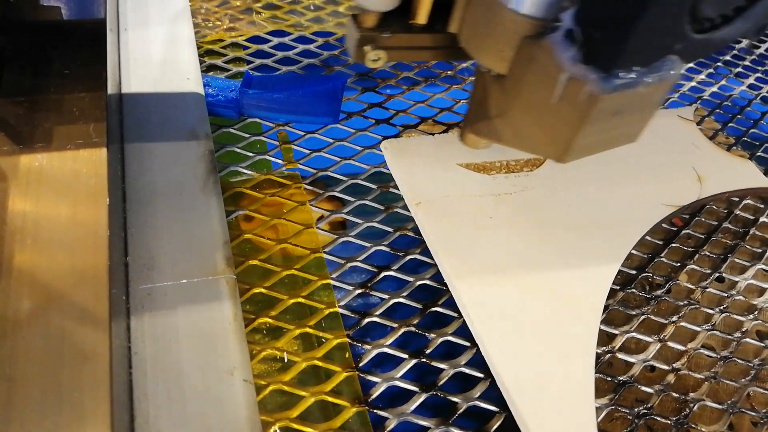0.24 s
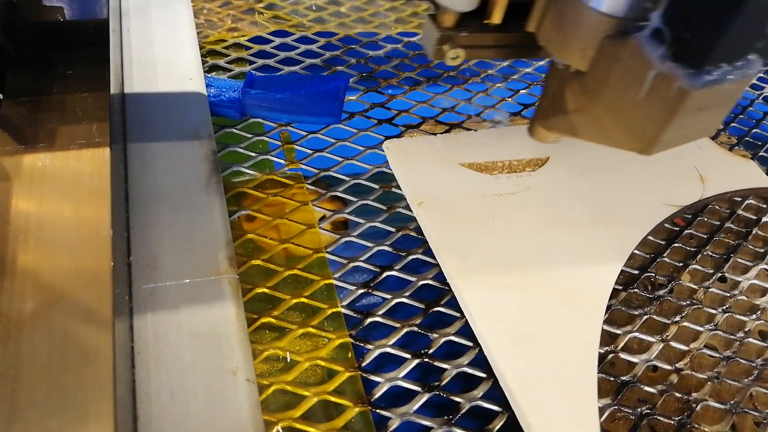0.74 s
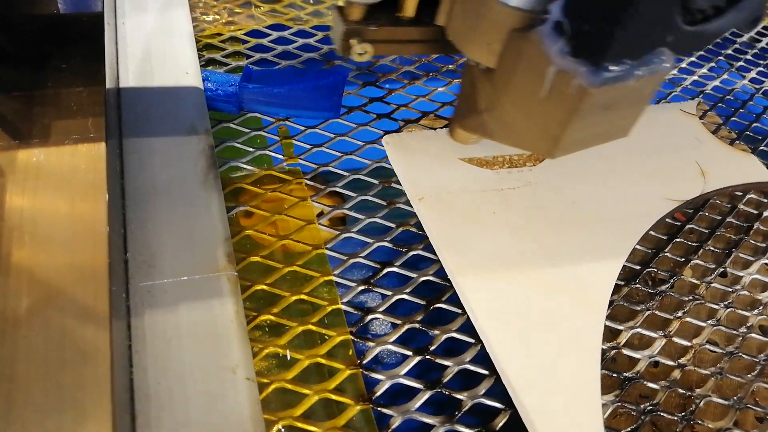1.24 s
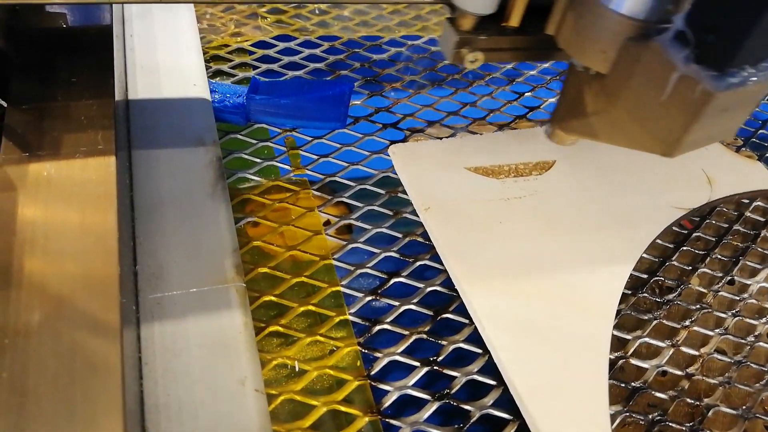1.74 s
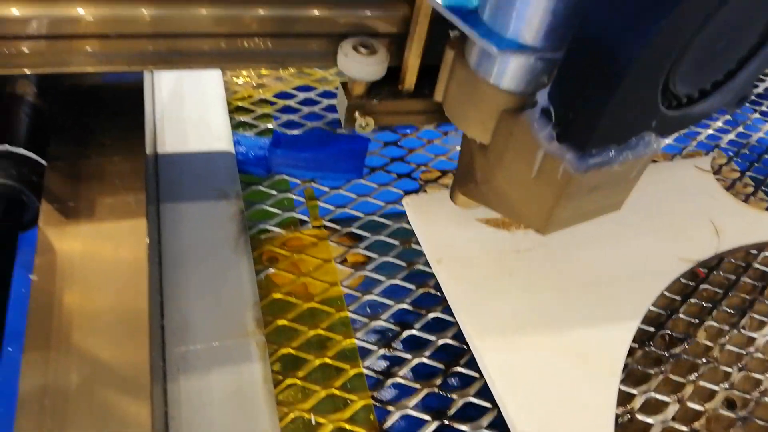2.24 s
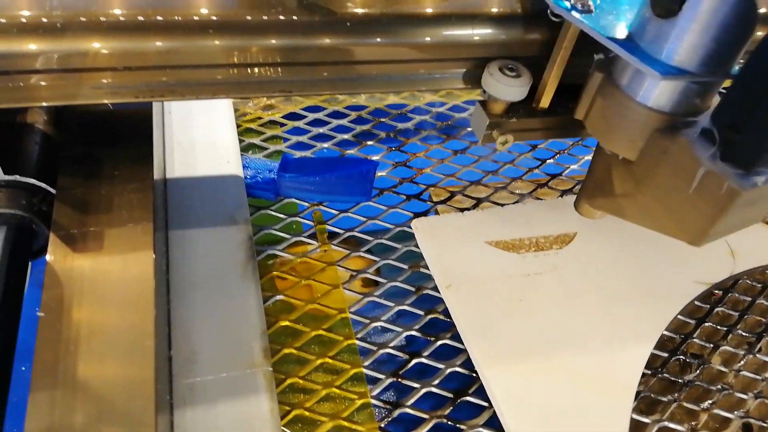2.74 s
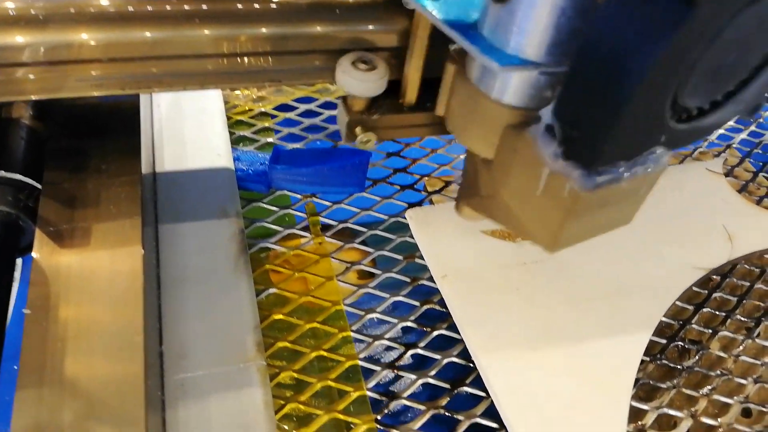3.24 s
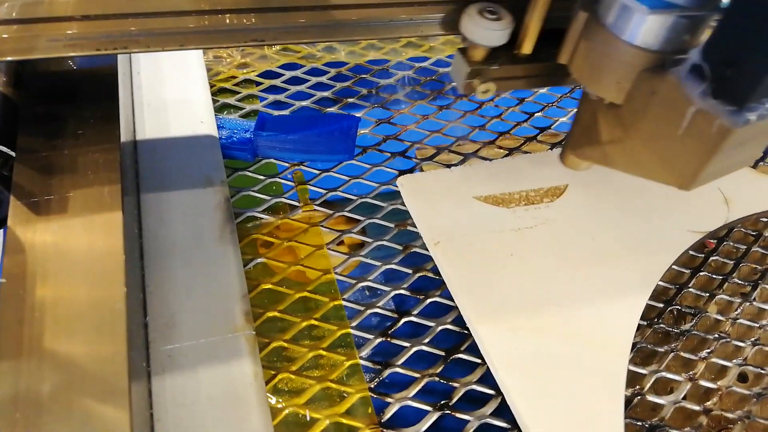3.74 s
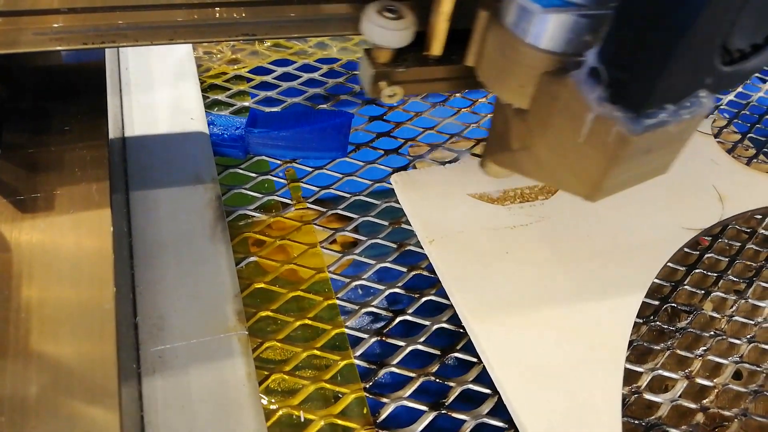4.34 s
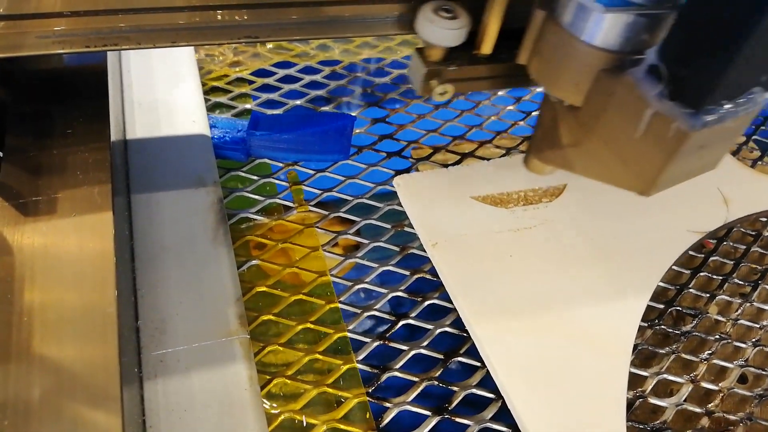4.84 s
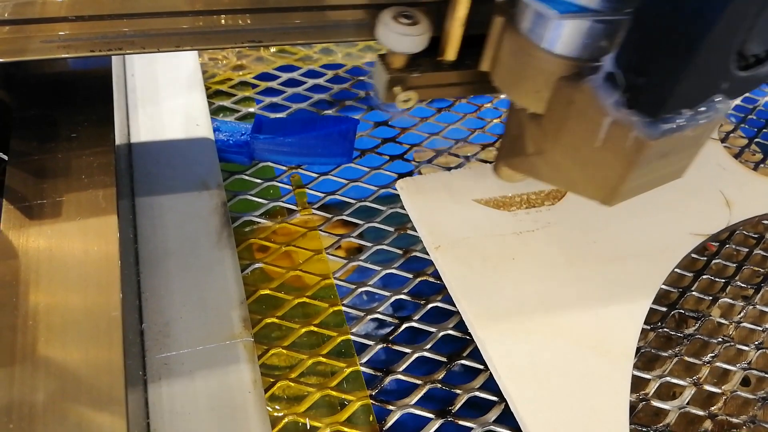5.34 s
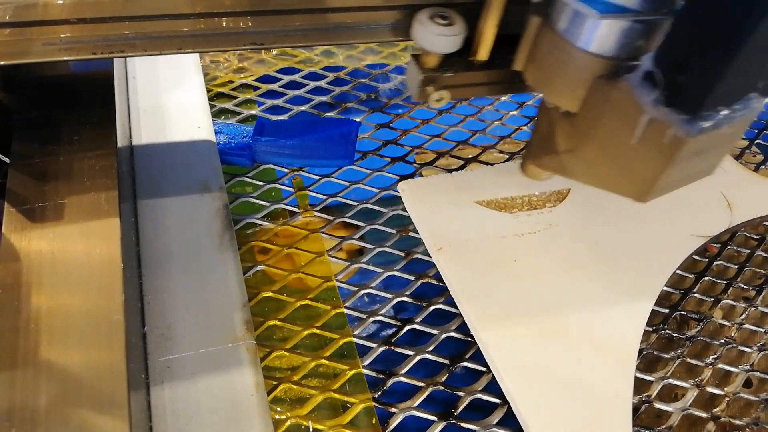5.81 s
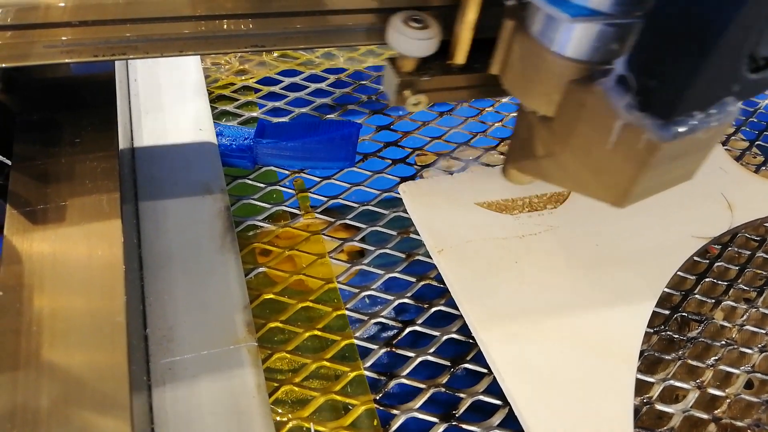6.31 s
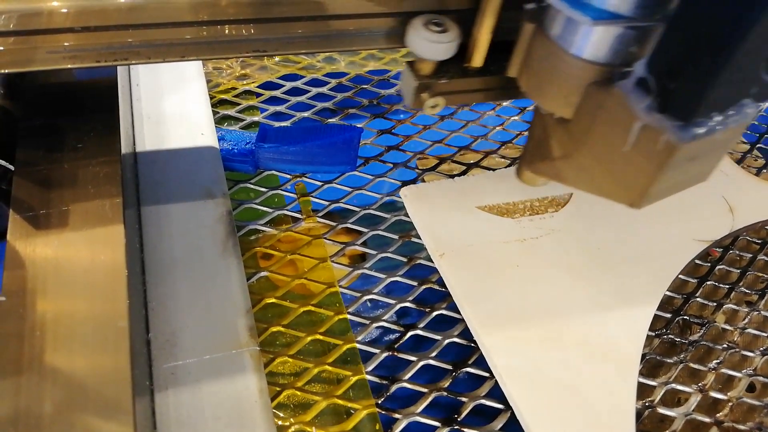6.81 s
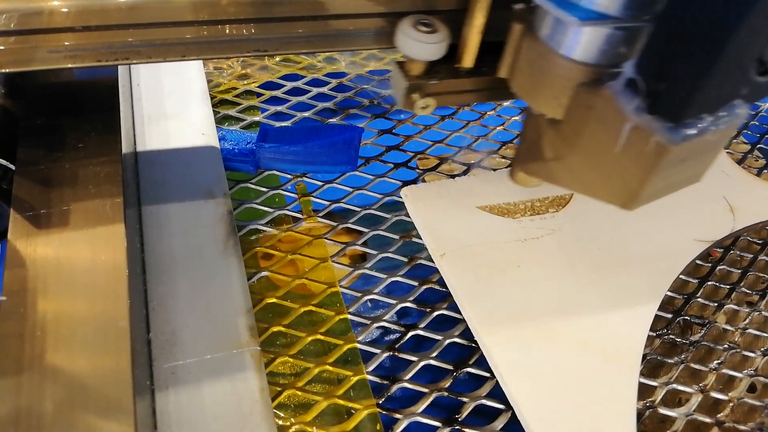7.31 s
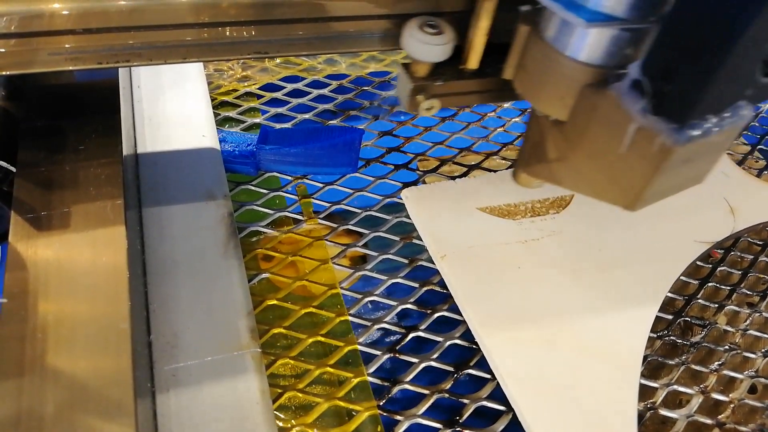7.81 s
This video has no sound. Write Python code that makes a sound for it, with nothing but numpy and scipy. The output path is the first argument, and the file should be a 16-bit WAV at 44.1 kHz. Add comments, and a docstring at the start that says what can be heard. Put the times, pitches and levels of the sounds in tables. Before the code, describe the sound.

A laser engraver's stepper motor sings a steady buzzy tone, dipping and rising at each turn twice a second, over rattling rollers and fan hum.

```python
"""A stepper motor sings as a laser engraver rasters line by line, heard from inside the case: a stack of tones
holds at full speed and glides down and up at every turn. Carriage rollers rattle as noise ringing the rail,
short bright noise ticks mark the turns, and each line feed swells frame tones and panel rumble. Fans and mains
hum on underneath as wavering tones, rumble and hiss; fingers creak on the camera as dull taps, and there is
one brief squeak."""
import sys
import numpy as np
from scipy import signal
from scipy.fft import rfft, irfft, next_fast_len
from scipy.io import wavfile
from scipy.ndimage import uniform_filter1d, map_coordinates

SR = 44100
rng = np.random.default_rng(int(sys.argv[2]) if len(sys.argv) > 2 else 0)


def store_wav(level_fs):
    """Save 16-bit WAV to argv[1]."""
    pcm = np.round(np.clip(np.atleast_2d(level_fs), -1, 1) * 32767)
    wavfile.write(sys.argv[1], SR, pcm.T.astype(np.int16))


N = 355578
T = np.arange(N) / SR  # time in s

# Spectra give relative level per Hz; each noise is brought to its own level afterwards.
# Mains and fan tones: f/Hz, mean level/dB, left-right/dB, left lead/rad, waver/dB
HUM_TONES = [(100.0, -48, .1, .02, 1.5), (200.0, -39.3, .3, .42, .6), (224.0, -42.3, -1.1, .44, 1.5),
             (298.2, -55, 2.5, .96, 2.5), (521.7, -48.8, 6.7, -2.65, 1), (596.5, -61.5, -.7, 3.06, 2),
             (745.5, -59, 1, 3.0, 2.5), (1043.4, -63, 3, -3.05, 2), (2086.8, -72, 0, -1, 2)]
# Air resonances colouring the fan rumble: f/Hz, width/Hz, level/dB
DUCT_MODES = [(71.6, 5, 12), (174.4, 8.9, -1.5), (363.7, 4.4, 3.5), (451, 20, 9.5), (690, 17, 7),
              (875, 13, -19), (1571, 19.6, 9), (1837, 23, 15)]
# Fan rumble spectrum: f/Hz, level/dB
RUMBLE_SPECTRUM = [(12, -60), (20, -20.5), (85, -5), (144, -6.5), (210, 0), (340, -9.5), (560, -16),
                   (900, -8.5), (1180, -19.5), (1330, -16), (1750, -15), (1930, -29.5), (2500, -35),
                   (4000, -120)]
# Air jet hiss spectrum: f/Hz, level/dB
HISS_SPECTRUM = [(1200, -50), (1900, -1.5), (2400, -1.5), (2650, -2), (2900, -8), (3150, -2), (4270, -2),
                 (4620, -3.5), (7560, -3), (9170, -5), (11400, -17), (14500, -23), (15600, -30)]
# Finger creaks on the camera's right side: t/s, level/dB (before the pulse shape)
FINGER_TAPS = [(2.351, -24), (2.4875, -17), (2.5248, -14.5), (2.580, -19), (2.83, -22)]
# Brief squeak: start t/s, end t/s, f/Hz, mean level/dB
SQUEAK_NOTE = (3.27, 3.312, 3500, -54)

# The head stands still: t/s, line feed shake level/dB
STANDSTILLS = [(-.066, -31.5), (.407, -35.5), (.881, -37), (1.357, -38), (1.832, -35), (2.309, -37.5),
               (2.785, -39.5), (3.263, -38), (3.744, -37), (4.225, -38), (4.707, -36), (5.189, -38),
               (5.673, -36), (6.157, -39), (6.643, -37), (7.131, -36.5), (7.617, -35), (8.105, -39)]
# Short bright ticks at each turn: t/s from standstill, mean level/dB (before smoothing)
TURN_TICKS = [(-.036, -42.5), (0.017, -41)]
# Turn tick spectrum: f/Hz, level/dB
TICK_SPECTRUM = [(3000, -43.5), (5500, -36), (6900, 8), (8800, 7), (10800, -14), (12000, -35.5)]
# Frame modes, relative to the shake: mean f/Hz, mean level/dB, left-right/dB, left lead/rad
FRAME_MODES = [(174.5, -2, 0.5, 0.43), (279.6, -6.5, -2, 1), (358.7, -7.5, -1, 1)]
# Panel rumble spectrum: f/Hz, level/dB
PANEL_SPECTRUM = [(90, -60.5), (160, 2.5), (300, -0.5), (450, -6.5), (750, -9.5), (1000, -13.5),
                  (1600, -22.5), (2200, -60.5)]
MODE_MIX_DB = 2  # spread of each frame mode's level from one line feed to the next

# Rattle along a stroke, by share of the way from turn to turn: share, mean level/dB
STROKE_RATTLE = [(.12, -42.5), (.28, -40), (.47, -43), (.65, -40), (.85, -39.5)]
# Roller rattle spectrum before the rail rings: f/Hz, level/dB
RATTLE_SPECTRUM = [(1180, -52), (2000, -28), (2920, -60), (3100, -5), (3400, -13.5), (3490, -9), (4110, 1),
                   (4720, -5), (5140, -2), (5850, -8.5), (7630, -1), (9620, 1), (12100, -11.5),
                   (14900, -13), (15600, -32.5)]
# Rail and carriage modes: f/Hz, width/Hz, level/dB
RAIL_MODES = [(3520, 59, 4.5), (3899.6, 77, 1), (4270, 104, 0.5), (4880, 77.7, -4), (9200, 71, -15),
              (9480, 82, 6), (10020, 310, 5.5), (11084, 80, 10)]
# Roller knocks at set times, mostly loud: t/s, level/dB (before smoothing)
SET_KNOCKS = [(.2709, -38), (.5022, -34), (.5879, -34), (.679, -40), (.6972, -41), (.7446, -41),
              (1.2535, -49), (1.282, -42), (1.507, -29.5), (1.5369, -33), (1.6544, -32), (1.696, -31),
              (1.7493, -33), (1.888, -41), (2.0581, -33), (2.4086, -37), (2.6493, -32), (3.1586, -38),
              (3.581, -41), (4.131, -36.5), (4.3723, -35), (4.5216, -34.5), (4.8339, -46), (5.0966, -43),
              (5.4664, -31), (5.8043, -36), (5.857, -35), (6.0368, -42), (6.0595, -35.5), (6.308, -38),
              (6.3795, -34), (6.4007, -32.5), (6.5483, -31), (6.7078, -33.5), (6.9972, -33), (7.2963, -38),
              (7.341, -34.5), (7.527, -39), (7.7042, -41), (7.9108, -35), (7.9916, -46)]
# More, mostly softer knocks at random times: mean rate/s, least level/dB, scale of the random lift/dB
SMALL_PER_S, SMALL_DB, SMALL_SPREAD_DB = 24, -47, 2
# Jolts on reaching full speed and on braking: t/s from standstill, mean level/dB
JOLT_S, JOLT_DB = .05, -41.5
BRAKE_S, BRAKE_DB = -.075, -41.5

STEP_HZ = 445.8  # mean step rate at full speed
# Motor tones at full speed: multiple of the step rate, mean level/dB before the mount, left-right/dB, left lead/rad
MOTOR_TONES = [(1, -53, 8, 2.5), (2, -56, 7.5, 0.2), (4, -47, 9, -0.73), (6, -68.5, 13, 2),
               (8, -59, 11, 1.64), (12, -59.5, 2, -0.8456), (16, -92, 4, 4)]
# Motor mount rings as a tone sweeps through: f/Hz, width/Hz, level/dB
MOUNT_MODES = [(960, 120, 0), (1540, 70, 9), (1790, 12, 0)]
# Braking or speeding up: time/s, mean softening/dB, random share of judder in the speed
RAMP_S, RAMP_DB, RAMP_JUDDER = .047, -6.5, .1

# The two microphone ports: f/Hz, likeness 0-1, left lead/rad, left-right/dB
STEREO_PORTS = [(60, .998, .02, 0), (200, .98, .4, 0), (300, .88, .9, 2), (390, .5, 1.3, 0),
                (480, .5, 3, 4), (650, .6, 2.9, 0), (740, .8, 3, 1), (930, .45, 4, 7), (1160, .45, 3.7, 0),
                (1330, .5, 3.9, 2), (1510, .3, 6.5, 8), (1680, .35, 3.1, 0), (1950, .25, 6, 5),
                (2250, .1, 7, 0), (2420, .1, 7, 3), (3000, .15, 8, 0), (3700, .5, 7, 2), (6200, .35, 9, -1),
                (9500, .42, 21, -4), (15000, .15, 28, -2)]
TOP_HZ = 15700  # band limit


def amp(db):
    """Turn decibels into a linear gain."""
    return 10 ** (np.asarray(db) / 20)


def unit(x):
    """Bring a sound to rms 1."""
    return x / np.sqrt(np.mean(x ** 2) + 1e-20)


def along(points, hz, axis=1):
    """Read one column of a table smoothly along a log frequency axis."""
    columns = np.transpose(points)
    return np.interp(np.log(hz + 1), np.log(columns[0] + 1), columns[axis])


def wobble(rate):
    """A smooth random curve with rate knots a second."""
    knots = rng.standard_normal(int(N * rate / SR) + 4)
    return map_coordinates(knots, [T * rate])


def peaks(modes, hz):
    """Gain of 1 with resonant bumps on top, added as power."""
    bumps = sum(amp(2 * db) / (1 + (2 * (hz - centre) / width) ** 2) for centre, width, db in modes)
    return np.sqrt(1 + bumps)


def ports(envelope, gain):
    """Enveloped, coloured noise of rms 1; the two ports share part of it, with a phase lead and tilt."""
    m = next_fast_len(N + 8192)
    hz = np.fft.rfftfreq(m, 1 / SR)
    left, other = rfft(envelope * rng.standard_normal((2, N)), m) * gain(hz)
    alike = np.clip(along(STEREO_PORTS, hz), 0, 1)
    shared = alike * np.exp(-1j * along(STEREO_PORTS, hz, axis=2)) * left
    right = shared + np.sqrt(1 - alike ** 2) * other
    tilt = amp(along(STEREO_PORTS, hz, axis=3) / 2)
    return unit(irfft([left * tilt, right / tilt], m)[:, :N])


def tone(phase, pan_db, lead):
    """A sine of rms 1, spread in level and phase between left and right."""
    side = np.array([[.5], [-.5]])
    return np.sqrt(2) * amp(side * pan_db) * np.sin(phase + side * lead)


def bursts(times, db, t60):
    """Envelope of sudden contacts that die away by 60 dB in t60 seconds."""
    index = np.clip((times * SR).astype(int), 0, N)
    hits = np.bincount(index, amp(db), N + 1)[:N]
    return signal.lfilter([1], [1, -amp(-60 / (t60 * SR))], hits)


def from_turn():
    """Signed seconds from the nearest standstill, and that turn's index."""
    turns = np.array(STANDSTILLS)[:, 0]
    k = np.searchsorted((turns[1:] + turns[:-1]) / 2, T)
    return T - turns[k], k


def fans():
    """Moving air rumbles through duct resonances and hisses; mains and fan tones waver a little."""
    rumble = ports(amp(0.65 * wobble(2.9687)),
                   lambda hz: amp(along(RUMBLE_SPECTRUM, hz)) * peaks(DUCT_MODES, hz))
    hiss = ports(amp(2.1 * wobble(60)), lambda hz: amp(along(HISS_SPECTRUM, hz)))
    out = amp(-38) * rumble + amp(-45.5) * hiss
    for hz, db, pan_db, lead, waver_db in HUM_TONES:
        level = amp(db + waver_db * wobble(5))
        phase = 2 * np.pi * hz * T + 0.33 * wobble(2.09) + rng.uniform(0, 6.86)
        out += level * tone(phase, pan_db, lead)
    return out


def small_sounds():
    """Fingers make dull one-cycle pulses on the right port; a gated, unsteady sine squeaks once."""
    out = np.zeros((2, N))
    u = np.arange(200) / SR / 0.00021  # time in units of 0.21 ms
    pulse = (u - 0.4126 * u ** 2) * np.exp(1 - u)
    for s, db in FINGER_TAPS:
        out[1, round(s * SR):][:len(u)] += amp(db) * pulse
    start, end, hz, db = SQUEAK_NOTE
    gate = np.clip(np.minimum(T - start, end - T) / 0.0045, 0, 1)
    phase = 2 * np.pi * hz * T + 0.72 * wobble(60)
    squeak = amp(db + 2.3 * wobble(88)) * gate * tone(phase, pan_db=-9.0, lead=0.81)
    return out + squeak


def turn_ticks():
    """Short bright ticks at each turn, as a high motor overtone glides through a resonance: noise bursts."""
    offsets, levels = np.array(TURN_TICKS).T
    times = np.array(STANDSTILLS)[:, :1] + offsets
    db = levels + 2.2 * rng.standard_normal(times.shape)
    level = uniform_filter1d(bursts(times.ravel(), db.ravel(), t60=0.039), 150)
    return np.sqrt(np.mean(level ** 2)) * ports(level, lambda hz: amp(along(TICK_SPECTRUM, hz)))


def line_feed():
    """The gantry steps to the next line, sets the frame modes swinging and the panels rumbling."""
    dt, k = from_turn()
    late = dt - .015  # the swell peaks 15 ms after standstill
    swell = np.exp(-np.where(late < 0, late / 0.042, late / 0.079) ** 2)
    out = amp(-0.5) * ports(amp(3.6 * wobble(40)), lambda hz: amp(along(PANEL_SPECTRUM, hz)))
    for hz, db, pan_db, lead in FRAME_MODES:
        detune, mix = rng.standard_normal((len(STANDSTILLS), 2))[k].T  # drawn anew at each turn
        pitch = hz * (1 + .04 * detune + .04 * wobble(25))
        level = amp(db + MODE_MIX_DB * mix + 2.7 * wobble(30))
        out = out + level * tone(2 * np.pi * np.cumsum(pitch) / SR, pan_db, lead)
    return out * swell * amp(np.array(STANDSTILLS)[k, 1])


def rollers():
    """Dense uneven contacts ring the rail while the head travels; braking silences them."""
    dt = from_turn()[0]
    turns = np.array(STANDSTILLS)[:, 0]
    fade = amp(-600 * np.clip(dt + 0.07235, 0, 1))  # falls 600 dB a second
    moving = np.where(dt < 0, fade, np.clip((dt - .046) / .005, 0, 1))
    stroke = np.interp(T, turns, np.arange(len(turns))) % 1
    load_db = np.interp(stroke, *np.transpose(STROKE_RATTLE)) + .8 * wobble(25)

    times = rng.random(5000) * N / SR
    contacts = bursts(times, 4.3 * rng.standard_normal(len(times)), t60=0.0065)
    grit = unit(0.8 + contacts) * amp(2.0 * wobble(50))

    gap, size = rng.random((300, 2)).T
    when = np.cumsum(-np.log(1 - gap)) / SMALL_PER_S
    small_db = SMALL_DB - SMALL_SPREAD_DB * np.log(1 - .9 * size)
    small = moving * bursts(when, small_db, t60=.035)

    jolt_times = turns[1:, None] + [JOLT_S, BRAKE_S]
    jolt_db = [JOLT_DB, BRAKE_DB] + 1.9 * rng.standard_normal(jolt_times.shape)
    jolts = bursts(jolt_times.ravel(), jolt_db.ravel(), t60=0.016)
    set_knocks = bursts(*np.transpose(SET_KNOCKS), t60=0.036)
    knocks = uniform_filter1d(set_knocks + small + jolts, size=60)
    level = amp(load_db) * moving * grit + np.abs(knocks)

    def rail(hz):
        """Rattle spectrum through the rail modes, with the treble rolled off."""
        return amp(along(RATTLE_SPECTRUM, hz)) * peaks(RAIL_MODES, hz) / (1 + (hz / 13000) ** 6)

    def top(hz):
        """High band with one narrow resonance."""
        band = (hz / 11500) ** 4 / (1 + (hz / 11500) ** 6) / (1 + (hz / 15200) ** 24)
        return band * peaks([(14550, 150, 5)], hz)

    rattle = np.sqrt(np.mean(level ** 2)) * ports(level, rail)
    sizzle = ports(moving ** 0.32 * level ** 0.23, top)  # more even on top, slower to fade
    return rattle + amp(-50.5) * sizzle


def mount(x):
    """The motor mount adds its resonant ringing to the direct sound."""
    m = next_fast_len(N + 8192)
    f = np.fft.rfftfreq(m, 1 / SR)
    ring = sum(amp(db) * 1j * f * w / (c * c - f * f + 1j * f * w) for c, w, db in MOUNT_MODES)
    return irfft(rfft(x, m) * (1 + ring), m)[:, :N]


def stepper():
    """Every tone follows the head's speed, flutters a little and builds up again after the turn."""
    dt = from_turn()[0]
    speed = np.clip(np.abs(dt + 0.00192) / RAMP_S, 0, 1)
    ramping = speed < 1
    flutter = 1 + 0.00196 * wobble(40) + RAMP_JUDDER * ramping * wobble(90)
    phase = 2 * np.pi * np.cumsum(STEP_HZ * speed * flutter) / SR
    throb = 1 + 0.078 * np.sin(.103 * phase + 0.82 * wobble(8))  # uneven belt load: sidebands
    out = 0
    for order, db, pan_db, lead in MOTOR_TONES:
        slip = 0.012 * order * wobble(70)  # higher tones are less steady
        level = amp(db + 0.86 * wobble(45))
        out = out + level * tone(order * phase + slip + 2 * np.pi * rng.random(), pan_db, lead)
    ramp = amp(RAMP_DB + 3.5 * wobble(150)) * speed ** 1.6
    settle = np.where(dt > 0, np.clip(0.8 + (dt - .07) / 0.041, .55, 1), 1)
    return mount(out * throb * np.where(ramping, ramp, settle))


def scene():
    """Sum every layer, from the fans up to the singing stepper."""
    return fans() + small_sounds() + turn_ticks() + line_feed() + rollers() + stepper()


def record(dry):
    """The camera keeps nothing above its band limit."""
    m = next_fast_len(N + 8192)
    keep = np.fft.rfftfreq(m, 1 / SR) < TOP_HZ
    return irfft(rfft(dry, m) * keep, m)[:, :N]


dry = scene()
out = record(dry)
store_wav(out)
```